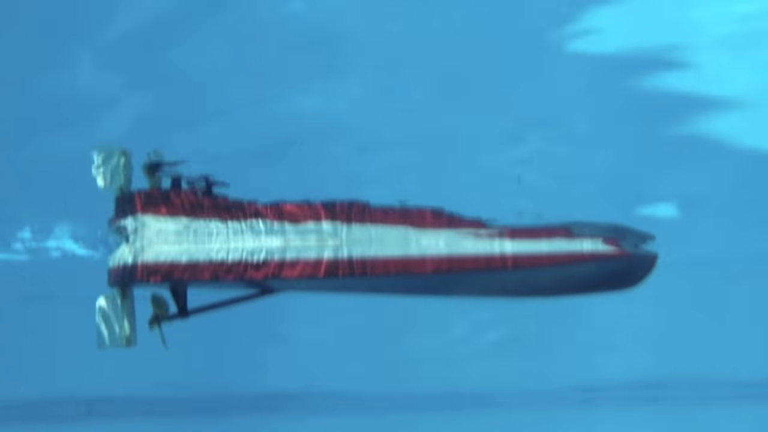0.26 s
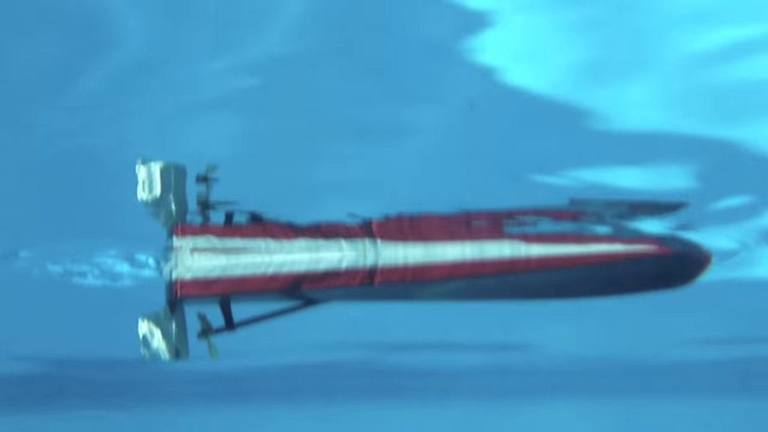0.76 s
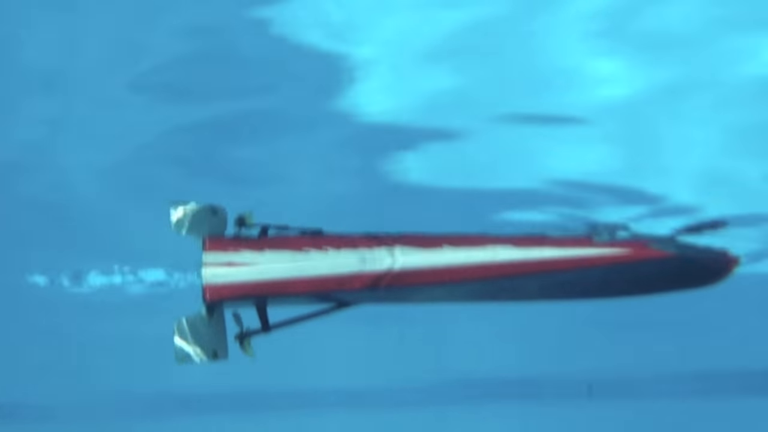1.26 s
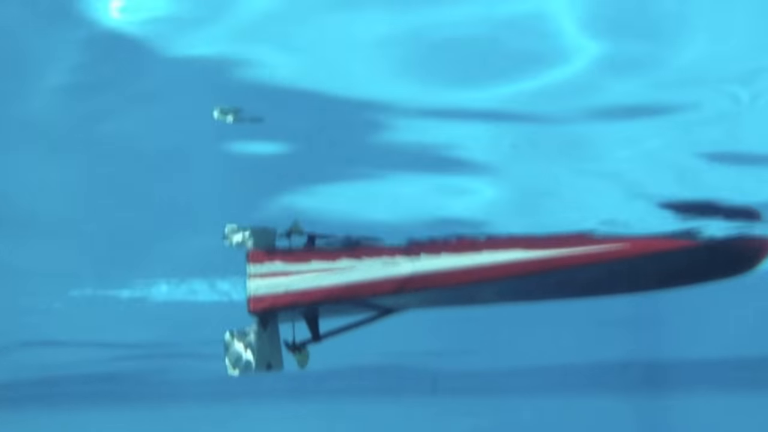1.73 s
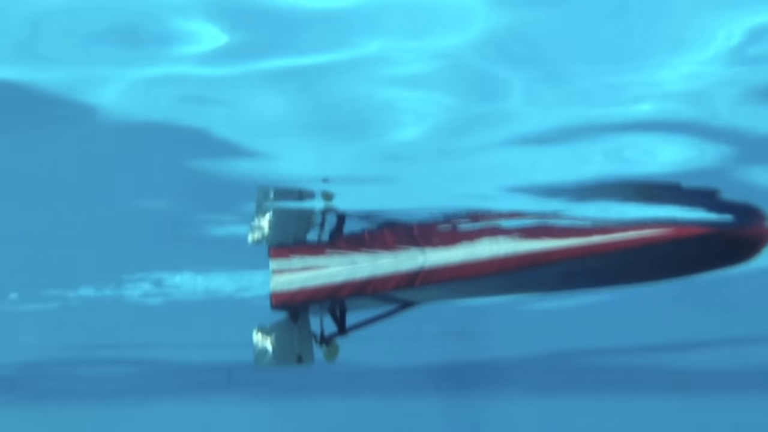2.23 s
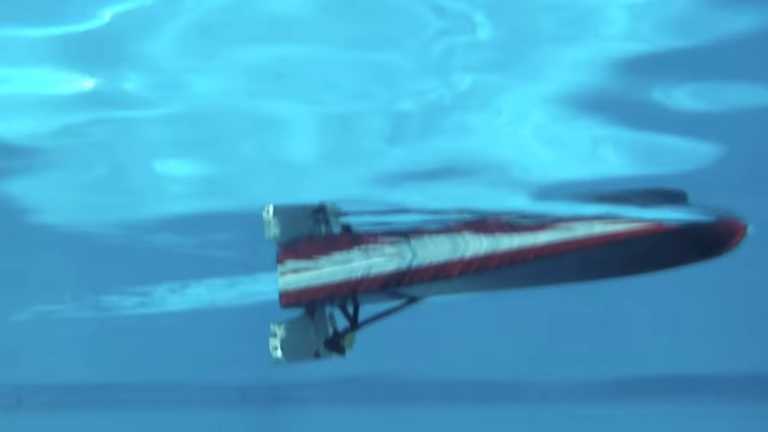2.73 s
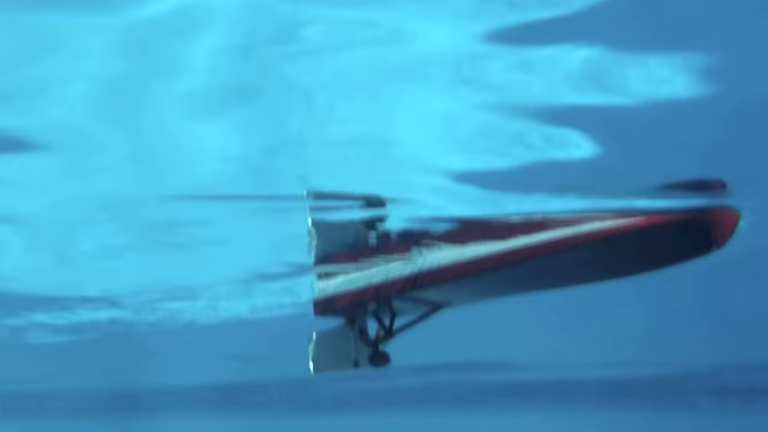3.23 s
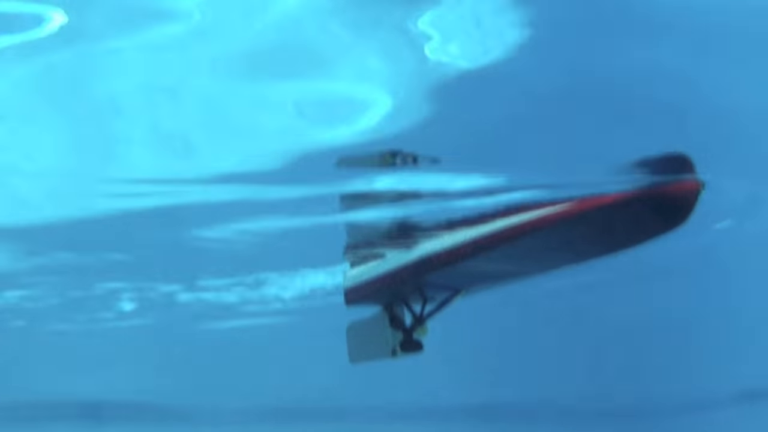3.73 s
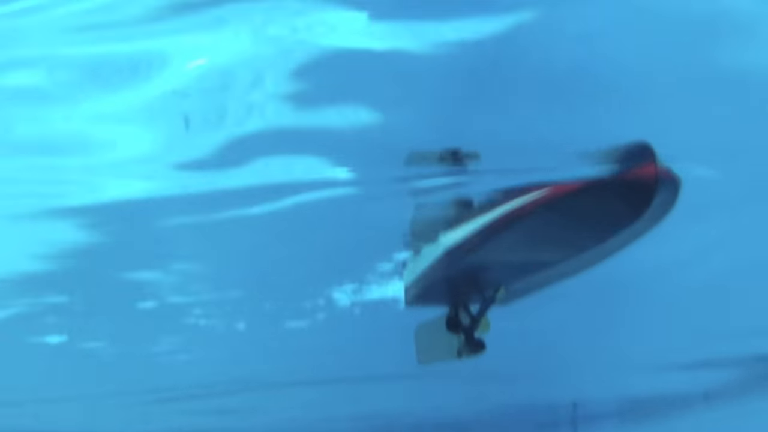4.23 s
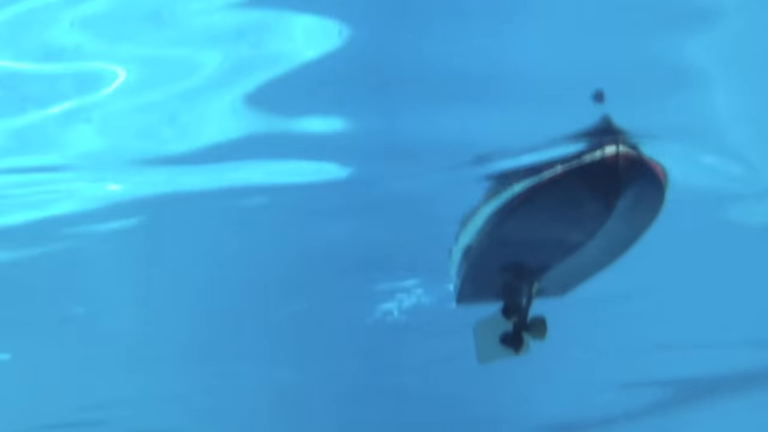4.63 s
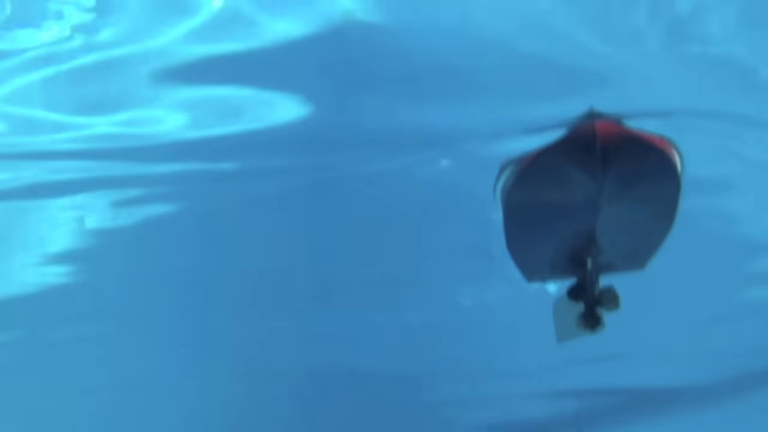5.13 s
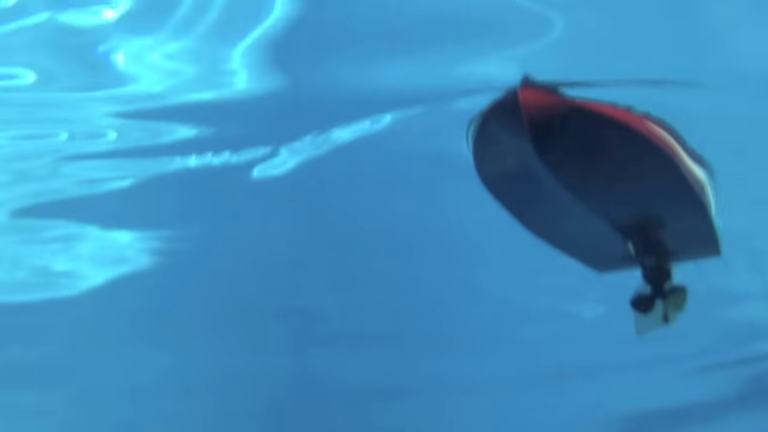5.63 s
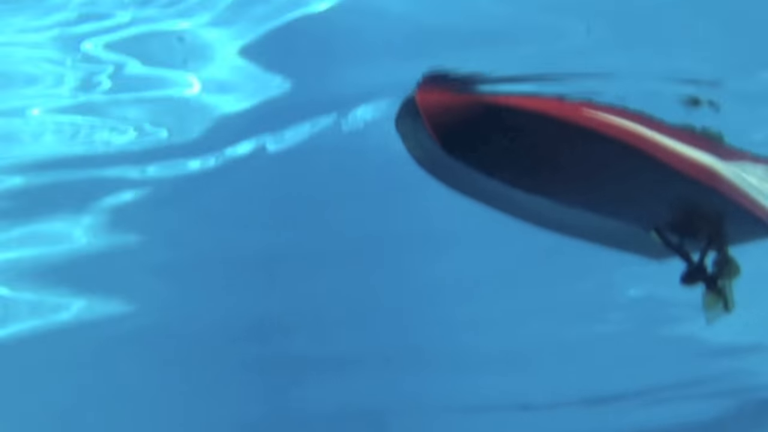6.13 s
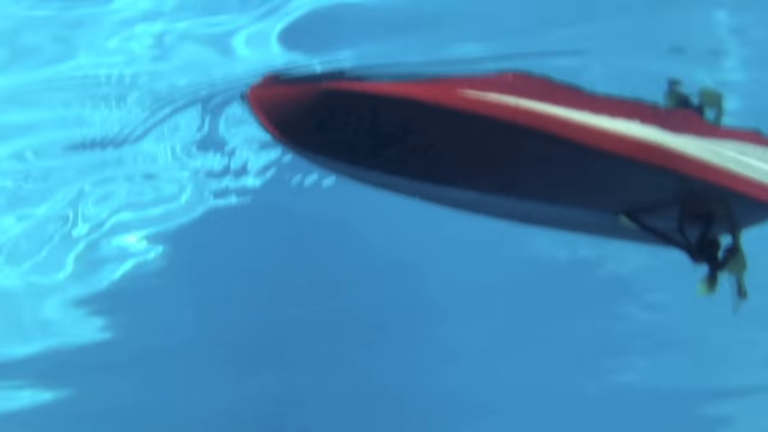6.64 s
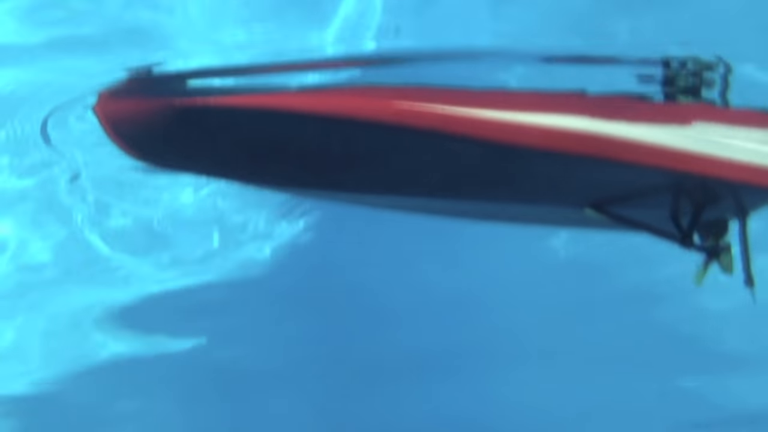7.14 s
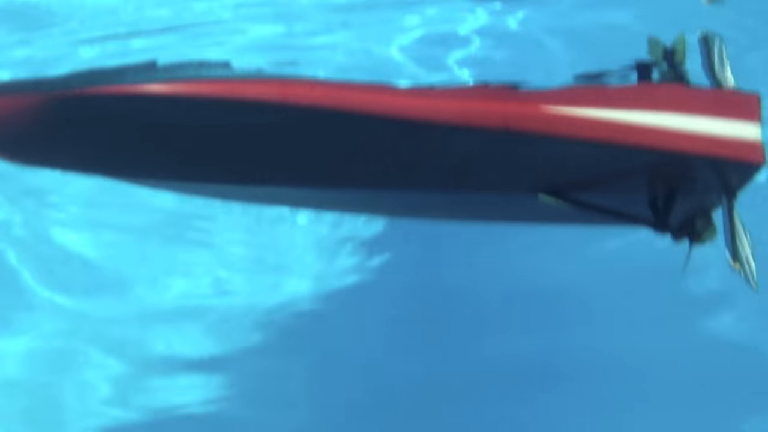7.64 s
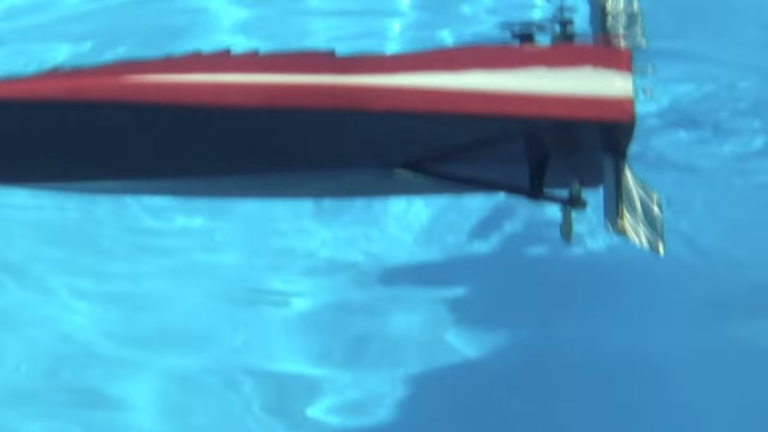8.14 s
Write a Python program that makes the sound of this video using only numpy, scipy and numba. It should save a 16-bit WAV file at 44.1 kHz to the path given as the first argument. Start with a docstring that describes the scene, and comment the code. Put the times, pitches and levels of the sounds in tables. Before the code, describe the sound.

A low, wavering rumble and faint hiss surround the tiny clicking gears of a toy boat, pulsing quickly and steadily. Deep, short thuds hit the submerged microphone case at uneven intervals, with a quick bubbling gulp near two seconds. The gear sound weakens around the middle, then returns with a changed hull ring and faint squeaks. Everything is close, muffled and nearly dry, with only tiny pool echoes.

```python
"""In a pool, a small wind-up toy boat passes a microphone in a camera case held under water.
Gear teeth click, rasp and ring the hull, swelling about four times a second; the mesh whines, a shaft squeaks.
Filtered noise makes the rumble of water and the hiss. Soft pushes ring the case as dull knocks, small bubbles
chirp, and a pocket of air escapes in froth and glugs. A limiter ducks everything after the loudest knocks."""
import sys
import numpy as np
from scipy import signal
from scipy.fft import rfft, irfft, next_fast_len
from scipy.io import wavfile
from scipy.ndimage import uniform_filter1d, minimum_filter1d
from numba import njit

SR = 44100
rng = np.random.default_rng(int(sys.argv[2]) if len(sys.argv) > 2 else 0)


def to_wav(sig):
    """Store sig (one row per channel, or 1-D mono) as 16-bit WAV at the path in sys.argv[1].

    Samples outside -1..1 are clipped; the rate is SR.
    """
    pcm = np.clip(np.atleast_2d(sig), -1, 1) * 32767
    pcm = np.round(pcm).astype(np.int16)
    wavfile.write(sys.argv[1], SR, pcm.T)  # frames by channels


N = 369657


def undb(db):
    """Turn decibels into a gain."""
    return 10 ** (np.asarray(db) / 20)


def level(x, db):
    """Scale a sound to a given rms (average) level."""
    return x * undb(db) / np.sqrt(np.mean(x ** 2))


def clock():
    """Time of every sample, in seconds."""
    return np.arange(N) / SR


def bell(t, width):
    """A smooth swell of height 1 round t = 0."""
    return np.exp(-.5 * np.minimum((t / width) ** 2, 100))


def colour(x, points):
    """Filter by a spectrum of (pitch_hz, level_db) points, joined on a log pitch scale."""
    size = next_fast_len(len(x))
    hz, db = np.transpose(points)
    bins_hz = np.maximum(np.arange(size // 2 + 1) * SR / size, 1)
    gain = undb(np.interp(np.log(bins_hz), np.log(hz), db))
    return irfft(rfft(x, size) * gain, size)[:len(x)]


def ring(x, hz, width):
    """One resonance, gain 1 at its centre."""
    return signal.lfilter(*signal.iirpeak(hz, hz / width, fs=SR), x)


def walk(rate):
    """Slow random wandering round 0 with a spread near 1; rate is new random values per second."""
    size = int(SR / rate)
    steps = np.repeat(rng.standard_normal(N // size + 1), size)
    smooth = uniform_filter1d(uniform_filter1d(steps, size), size)
    return np.sqrt(2) * smooth[:N]


def tone(hz):
    """A sine of rms 1 that follows a pitch curve."""
    return np.sqrt(2) * np.sin(2 * np.pi * np.cumsum(hz) / SR)


def gear_load(swell_s=0.042, idle=0.31, half_turn_s=0.13, rub_s=0.021, rub_db=-11, uneven_db=.3, count=35):
    """The wheel binds hard once a turn and rubs lightly half a turn later."""
    # how hard the gears bind: start_s, level_db
    binding = [(0, 2.5), (.9, .5), (1.9, 2.5), (2.35, -2), (2.8, 0), (4.2, -2.5), (4.7, -8), (5.0, -2),
               (5.95, -1.5), (6.45, 1.8), (6.75, -1), (7.45, 0), (8.2, 3.5)]
    # the wheel turns ever more slowly as the drive runs down
    first_turn_s, turn_s, slowing_s_per_turn = .179, .2368, .00036
    t, turn = clock(), np.arange(count)
    times = first_turn_s + turn_s * turn + slowing_s_per_turn * turn ** 2 / 2
    sizes_db = np.interp(times, *np.transpose(binding)) + uneven_db * rng.standard_normal(count)
    swells = np.zeros(N)
    for s, db in zip(times, sizes_db):
        rub = undb(rub_db) * bell(t - s - half_turn_s, rub_s)
        swells += undb(db) * (bell(t - s, swell_s) + rub)
    return idle + (1 - idle) * swells


def teeth(spiky_db):
    """Gear teeth meet in dense tiny clicks of uneven size."""
    sizes = undb(spiky_db * rng.exponential(size=N).clip(0, 5))
    struck = rng.random(N) < .07  # chance of a click at each sample
    return level(rng.standard_normal(N) * sizes * struck, 0)


def hull_ring(hull_db=-63.0):
    """Tooth clicks ring the hull; its balance of pitches shifts as the boat turns."""
    # hull resonances: pitch_hz, width_hz, going_out_db, coming_back_db
    hull_modes = [(516.4, 40, -5.5, 7), (603, 67, 4.5, 1), (694, 45, 4, -3.5), (981, 29, 0, 1.5),
                  (1170, 210, -2.5, -3), (1281, 28, -9.5, 10), (1333, 39, 4.5, 6), (1574, 79, -1, -3),
                  (1926, 70, -9, -11.5)]
    # which way the boat heads: start_s, share (0 going out to 1 coming back)
    heading = [(0, 0.032), (3.6, 0), (5.2, 0.93), (8.4, 0.63)]
    back = np.interp(clock(), *np.transpose(heading))
    hull = np.zeros(N)
    for hz, width, out_db, back_db in hull_modes:
        mode = ring(ring(teeth(spiky_db=2), hz, width), hz, width)
        # other panels face the listener once the boat has turned
        hull += mode * undb(out_db + back * (back_db - out_db))
    return level(hull, hull_db) * undb(0.9 * walk(22))


def gear_rasp(clicks, rasp_db=-62.5):
    """The clicks of the teeth, filtered into a bright, uneven rasp."""
    # rasp of the gear teeth: pitch_hz, level_db
    rasp_colour = [(400, -34), (1000, -7), (2350, -9), (2550, 0), (3150, 4), (3600, 0.5), (4050, 1.5),
                   (4400, -3.5), (5000, -12), (5900, -11), (7500, -9), (9600, -10.5), (10500, -17),
                   (15000, -19)]
    return level(colour(clicks, rasp_colour), rasp_db) * undb(1.6 * walk(35))


def gear_ring(clicks, gear_db=-66, gear_hz=5203, narrow_hz=530, wide_hz=1300):
    """The same clicks ring a gear, through two resonances at one pitch."""
    rung = ring(ring(clicks, gear_hz, narrow_hz), gear_hz, wide_hz)
    return level(rung, gear_db) * undb(1.2 * walk(40))


def gear_whine():
    """Play in the gears makes each tone of the mesh flutter in pitch and strength."""
    # tones of the gear mesh: pitch_hz, level_db (rms, before the load), wander_hz
    whine_tones = [(4915, -73.5, 40), (5160, -70, 16), (5275, -70, 18), (1294, -71.5, 19)]
    whine = np.zeros(N)
    for hz, db, wander in whine_tones:
        pitch_hz = hz + wander * (walk(12) + walk(300))
        whine += level(tone(pitch_hz) * undb(4.0 * walk(45)), db)
    return whine


def shaft_squeaks():
    """A shaft squeaks in brief tones with unsteady pitch and strength."""
    # squeaks: middle_s, level_db (before the flutter), pitch_hz, half_length_s
    squeak_rows = [(.42, -75, 1900, 0.13), (0.954, -77, 1925, .15), (6.236, -68, 1560, 0.054),
                   (7.125, -69, 3050, 0.081), (7.76, -65, 3010, 0.083)]
    t, squeaks = clock(), np.zeros(N)
    for s, db, hz, half in squeak_rows:
        flutter = .75 + .35 * walk(40)
        squeaks += undb(db) * bell(t - s, half) * tone(hz + 20 * walk(210)) * flutter
    return squeaks


def motor(whine_follow=0.95):
    """The load on the gears swells the clicks and whine; the squeaks keep their own level."""
    load, clicks = gear_load(), teeth(spiky_db=1.56)
    clatter = hull_ring() + gear_rasp(clicks) + gear_ring(clicks)
    return load * clatter + load ** whine_follow * gear_whine() + shaft_squeaks()


def water(flow_db=-46.5):
    """Water moving round the case: low noise whose level wanders."""
    # spectrum of the rumble: pitch_hz, level_db
    flow_colour = [(15, -12.5), (28, -10), (45, 0.5), (70, 2.5), (115, 1), (170, 0), (215, -5), (260, -18),
                   (310, -24.5), (420, -34), (900, -50), (3000, -79)]
    return level(colour(rng.standard_normal(N), flow_colour), flow_db) * undb(0.43 * walk(6.7))


def hiss(hiss_db=-63.2):
    """Steady noise of the microphone."""
    # spectrum of the hiss: pitch_hz, level_db
    hiss_colour = [(100, -13), (800, 2.5), (2300, 2.5), (2600, 8), (3200, 9.5), (4400, 4), (5200, 0),
                   (6000, 2), (9600, -1.5), (10300, -4), (12500, -2), (15000, -5)]
    return level(colour(rng.standard_normal(N), hiss_colour), hiss_db)


def bubbles(rise=0.034):
    """Each small bubble rings for a few cycles and fades, its pitch creeping up."""
    # bubbles: start_s, level_db (as the ringing starts), pitch_hz, ring_time_ms
    bubble_rows = [(.0765, -23, 640, 1.7), (2.026, -53, 880, 7.9), (2.1627, -28, 1100, 1.7),
                   (2.206, -40, 1546, 6.7), (5.4245, -48.5, 530, 3.3), (5.5607, -41.5, 560, 2.8),
                   (6.059, -38.5, 510, 4.1), (7.3, -42, 560, 4.6)]
    out, t = np.zeros(N + SR), np.arange(SR // 10) / SR
    for s, db, hz, ring_ms in bubble_rows:
        age = t * 1000 / ring_ms  # counted in ring times
        start = int(s * SR)
        chirp = np.sin(2 * np.pi * hz * t * (1 + rise * age / 2))
        out[start:start + len(t)] += undb(db) * np.exp(-age) * chirp
    return out[:N]


def spring(x, hz, width):
    """A damped mass on a spring: gain 1 at resonance, falling 12 dB an octave above."""
    pole = np.exp((2j * np.pi * hz - np.pi * width) / SR)
    return signal.lfilter([2 * np.pi * width / SR], [1, -pole], x).imag


def nudges(per_s=1.2, middle_db=-37, spread_db=2.5, middle_soft_ms=2.0, edge_db=-25):
    """Faint nudges of the water at random times, in rows like those of the knocks."""
    rows = []
    for when, force, soft in rng.random((int(per_s * N / SR), 3)):
        peak_db = middle_db + spread_db * (2 * force - 1)
        soft_ms = middle_soft_ms * 2 ** (2 * soft - 1)
        rows.append((when * N / SR, peak_db, soft_ms, edge_db))
    return rows


def knocks(edge_share=.22, leak_hz=112):
    """Each knock is a soft push with a brief hard edge; the water damps the case within a few cycles."""
    # knocks on the case: middle_s, peak_db, softness_ms (of the push), edge_db (hard edge)
    knock_rows = [(.077, -14.3, .06, -40), (.6624, -34.8, .46, -22), (.704, -30, 3.4, -50),
                  (.8975, -19.6, 1.03, -12), (1.1714, -.5, .12, -40), (1.4622, -19.8, .98, -47),
                  (1.9112, -3.8, 2.16, -21), (1.9304, -1.2, 1.67, -27), (2.0264, -32.6, .06, -40),
                  (2.1665, -1.2, .52, -24), (2.7254, -14, .39, -40), (3.2584, -24.3, .84, -50),
                  (3.5064, -13.8, 2.15, -39), (3.5161, -11.7, 3, -45), (3.54, -1.2, 1.42, -46),
                  (3.9506, -27.3, 1.59, -21), (4.1934, -25.2, 1.27, -31), (4.4788, -1.6, 1.85, -36),
                  (4.8114, -10.8, 1.46, -55), (5.3031, -22.3, 1.39, -31), (5.56, -38.5, .1, -40),
                  (5.767, -35.1, .06, -40), (6.061, -30, .1, -40), (6.4774, -10.4, 2.42, -27),
                  (6.5928, 1.4, 2.0, -45), (6.9896, -30.3, .8, -31), (7.2776, -.8, 1.43, -46),
                  (7.3346, -10.5, .26, -19), (7.7462, -24.2, .91, -21)]
    # resonances of the water-loaded case: pitch_hz, width_hz, level_db
    case_modes = [(192.5, 43.3, 25), (109.4, 20, 3), (330, 40, -2.5), (552, 216, -21)]
    out, size = np.zeros(N + SR), SR // 5
    # slow pressure leaks past the microphone
    leak = signal.butter(4, leak_hz, "high", fs=SR, output="sos")
    for s, db, soft_ms, edge_db in knock_rows + nudges():
        start = max(int(s * SR) - SR // 50, 0)  # the push builds up before its middle
        ms = ((start + np.arange(size)) / SR - s) * 1000
        edge_ms = edge_share * soft_ms  # a softer contact has a blunter edge too
        push = bell(ms, soft_ms) / soft_ms + undb(edge_db) * bell(ms, edge_ms) / edge_ms
        rung = sum(undb(mode_db) * spring(push, hz, width) for hz, width, mode_db in case_modes)
        thud = signal.sosfilt(leak, rung)
        out[start:start + size] += undb(db) * thud / np.abs(thud).max()
    return out[:N]


def froth(start_s=2.161, froth_db=-31.5, attack_s=.005, fade_db_per_s=150, length_s=.074, release_s=.016):
    """A short fizz of torn air that starts just before the glugs and runs under the first of them."""
    # spectrum of the froth: pitch_hz, level_db
    froth_colour = [(150, -21), (320, 6.5), (500, -1.5), (1100, -11.5), (1350, -16.5), (1700, -23),
                    (2100, -28), (3000, -25), (5000, -54)]
    age = np.clip(clock() - start_s, 0, 1)
    attack = np.minimum(age / attack_s, 1)
    release = np.clip(1 - (age - length_s) / release_s, 0, 1)
    fizz = level(colour(rng.standard_normal(N), froth_colour), froth_db)
    return attack * release * undb(-fade_db_per_s * age) * fizz


def gulp(count=7, uneven_db=1.0, wobble=.04, octave_db=-23):
    """An air pocket throbs in glugs that come ever later and fade; its pitch wobbles upward as it shrinks."""
    start_s, first_db, fade_db_per_s = 2.1785, 1, 160
    gap_s, slowing_s, half_s = .0205, .0023, .0069  # each gap is longer than the last by slowing_s
    first_hz, rise_hz_per_s = 163, 250
    age, glug = clock() - start_s, np.arange(count)
    ages = gap_s * glug + slowing_s * glug * (glug - 1) / 2
    sizes_db = first_db - fade_db_per_s * ages + uneven_db * rng.standard_normal(count)
    throb = sum(undb(db) * bell(age - s, half_s) for s, db in zip(ages, sizes_db))
    pitch_hz = (first_hz + rise_hz_per_s * age) * (1 + wobble * walk(120))
    phase = 2 * np.pi * np.cumsum(pitch_hz) / SR
    phase = phase - phase[int(start_s * SR)]
    # the widest swings are lopsided, which adds the octave
    return throb * (np.cos(phase) + undb(octave_db) * throb * np.cos(2 * phase))


def pool(x, echo_db=-18, t60=0.076, first_s=.008):
    """Faint echoes between floor, walls and surface give each sound an uneven tail (t60: s to fall 60 dB)."""
    t = np.arange(SR // 4) / SR
    echoes = rng.standard_normal(len(t)) * np.exp(-np.log(1000) * t / t60) * (t > first_s)
    echoes = echoes / np.linalg.norm(echoes)
    return x + undb(echo_db) * signal.fftconvolve(x, echoes)[:N]


def scene():
    """Everything reaches one microphone inside the case."""
    echoing = pool(knocks() + gulp() + froth() + bubbles())
    return (echoing + motor() + water() + hiss())[None]


@njit
def hold(over_db, release):
    """Jump to each new peak, then let go exponentially."""
    out, held = np.empty(len(over_db)), 0.
    for i in range(len(over_db)):
        held = max(over_db[i], held * release)
        out[i] = held
    return out


def record(dry, ceiling_db=-3.0, release_s=0.75, top_hz=15350):
    """A fast limiter bites into the loudest knocks and recovers slowly; the top is cut."""
    over_db = np.maximum(20 * np.log10(np.abs(dry[0]) + 1e-9) - ceiling_db, 0)
    held_db = hold(over_db, np.exp(-1 / (release_s * SR)))
    # smooth the gain over 20 samples
    gain_db = uniform_filter1d(minimum_filter1d(-held_db, size=20), size=20)
    top_cut = signal.ellip(12, .1, 80, top_hz, fs=SR, output="sos")
    return signal.sosfilt(top_cut, dry * undb(gain_db))


dry = scene()
out = record(dry)
to_wav(out)
```